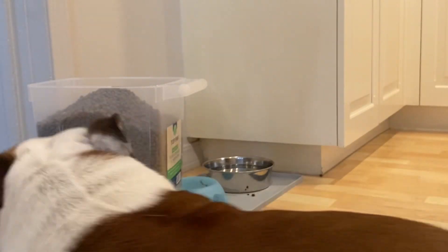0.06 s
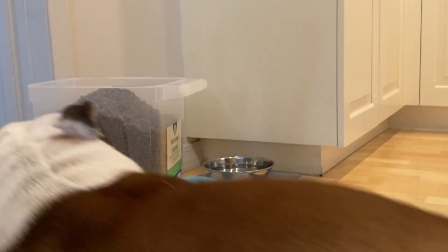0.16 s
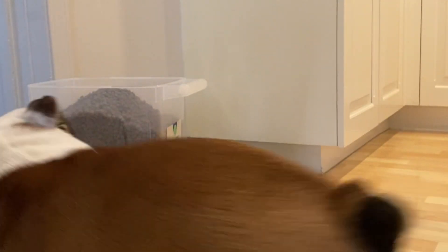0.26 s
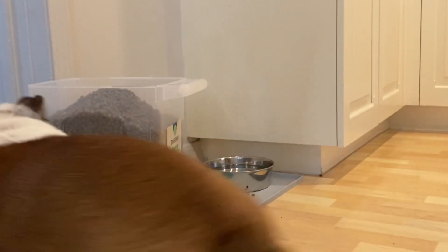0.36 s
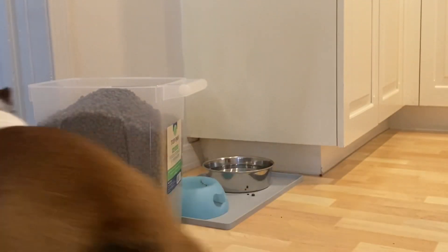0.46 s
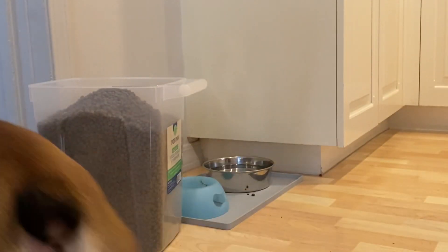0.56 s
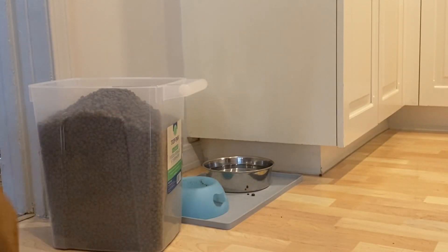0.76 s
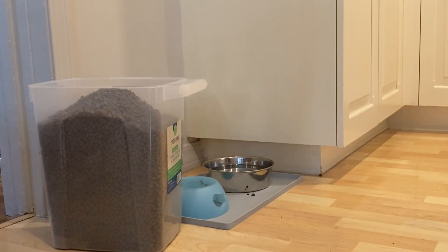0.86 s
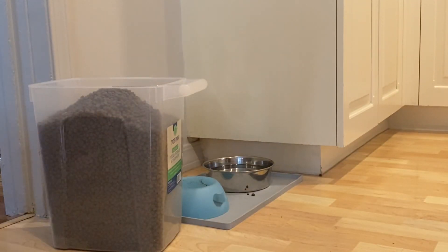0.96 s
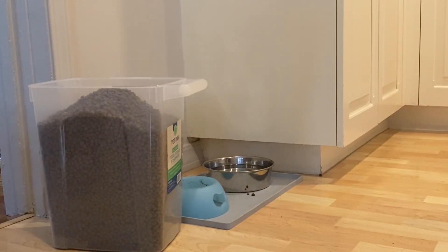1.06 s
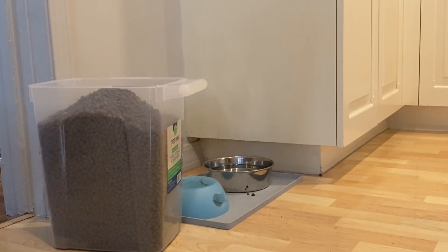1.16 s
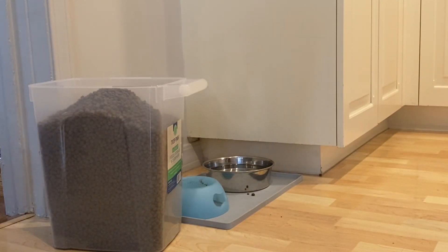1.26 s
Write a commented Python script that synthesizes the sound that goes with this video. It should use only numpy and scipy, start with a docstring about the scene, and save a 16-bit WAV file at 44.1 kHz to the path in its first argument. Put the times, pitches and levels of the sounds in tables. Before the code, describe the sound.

Dog claws click in quick clusters on a hard kitchen floor, with soft paw thuds and coat rustle. Early on, an unseen object thumps and clatters; the steps then fade away. Close stereo microphone, lively bare room, faint hiss.

```python
"""Soft paws thud and a coat rustles over a low hum and a faint hiss: a dog walks past on a hard kitchen floor.
Something out of sight thumps and clatters: noise bursts and struck modes that ring on.
Claws land in quick clusters, each a noise crack with a falling chirp of the boards; some skid as gritty
filtered noise. Full landings knock, as damped modes. Two close microphone ports hear it all."""
import sys
import numpy as np
from scipy import signal
from scipy.fft import rfft, irfft, next_fast_len
from scipy.io import wavfile
from scipy.ndimage import map_coordinates

SR = 44100
rng = np.random.default_rng(int(sys.argv[2]) if len(sys.argv) > 2 else 0)


def transcribe(signal):
    """Save signal, clipped to [-1, 1], as a 16-bit WAV file at the path in sys.argv[1]."""
    frames = np.atleast_2d(signal).T
    limited = np.clip(frames, -1, 1)
    pcm = np.round(limited * 32767).astype(np.int16)
    wavfile.write(sys.argv[1], SR, pcm)


N = 57330  # samples, 1.3 s

STRIKE_ATTACK_S = 0.00038  # shared by the thump and the knocks


def amp(db):
    """Decibels to gain."""
    return 10 ** (np.asarray(db) / 20)


def unit(x):
    """Scale to rms 1."""
    return x / np.sqrt(np.mean(x ** 2) + 1e-20)


def along(points, hz):
    """Read (Hz, value) points on a log frequency axis."""
    f, v = np.transpose(points)
    return np.interp(np.log(hz + 1), np.log(f + 1), v)


def filtered(x, response):
    """Multiply the spectrum of x by a response of frequency."""
    n = x.shape[-1]
    m = next_fast_len(2 * n)
    spectrum = rfft(x, m) * response(np.fft.rfftfreq(m, 1 / SR))
    return irfft(spectrum, m)[..., :n]


def noise(spectrum, size, tilt_db=0):
    """Two unrelated coloured noises, rms 1 together; the tilt in dB per octave slopes only the treble."""
    tilt_floor_hz, tilt_pivot_hz = 1730, 6000

    def colour(hz):
        octaves = np.log2(np.maximum(hz, tilt_floor_hz) / tilt_pivot_hz)
        return amp(along(spectrum, hz) + tilt_db * octaves)

    return unit(filtered(rng.standard_normal((2, size)), colour))


def fade(t, t60):
    """Free decay, falling 60 dB in t60 seconds."""
    return np.exp(-np.log(1000) * t / t60)


def onset(t, attack_s):
    """Exponential rise from rest."""
    return 1 - np.exp(-t / attack_s)


def dying(x, t60s):
    """Split x into overlapping bands and let each die at its own speed."""
    t = np.arange(x.shape[-1]) / SR
    corners = [hz for hz, _ in t60s]
    out = 0
    for (_, t60), pick in zip(t60s, np.eye(len(t60s))):
        weights = list(zip(corners, pick))  # 1 at this band's corner, 0 at the others
        band = filtered(x, lambda hz: along(weights, hz))
        out = out + band * amp(-60 * t / t60)
    return out


def wobble(rate):
    """A smooth random curve with rate knots a second."""
    knots = rng.standard_normal(N // 20)
    return map_coordinates(knots, [np.arange(N) * rate / SR], mode="mirror")


def ringing(modes, t, favoured_hz=None):
    """Damped modes: sines from zero in the first channel, at random phases in the second."""
    hz, db, t60 = np.transpose(modes)[..., None, None]
    if favoured_hz is not None:  # the spot that is struck favours the modes near one pitch
        spot_db, spot_octaves = 7.5, 0.27
        db = db + spot_db * np.exp(-(np.log2(hz / favoured_hz) / spot_octaves) ** 2)
    path_turns = rng.random(hz.shape) * [[0], [1]]
    return np.sum(amp(db) * fade(t, t60) * np.sin(2 * np.pi * (hz * t + path_turns)), axis=0)


def add(track, s, x):
    """Mix x into the track at time s."""
    i = max(0, round(s * SR))
    track[..., i:i + x.shape[-1]] += x[..., :N - i]


def room(x, wet_db):
    """The bare kitchen answers x with a decaying noise tail, different in each channel."""
    # decay of the room: f/Hz, t60/s
    room_t60 = [(200, 0.13), (1500, 0.59), (4000, 0.73), (7000, 0.52), (13000, 0.41)]
    # colour of the tail before it decays: f/Hz, level/dB
    room_colour = [(200, 10.5), (1000, 3), (2300, -1.5), (3500, -2.5), (4500, -5), (6500, -2), (9000, -3.5),
                   (12000, -4), (15500, -5.5)]
    build_s = 0.003
    t = np.arange(N) / SR
    tail = dying(noise(room_colour, N), room_t60) * onset(t, build_s)
    tail = tail / np.linalg.norm(tail[0])
    wet = signal.fftconvolve(x[:1], tail, axes=1)[:, :N]
    direct = np.pad(x, ((0, 0), (0, N - x.shape[1])))
    return direct + amp(wet_db) * wet


def background():
    """Steady coloured hiss under a low hum whose level sinks until it lifts a little at the very end."""
    # spectrum of the hum: f/Hz, relative density/dB per Hz
    hum_spectrum = [(20, 4.5), (40, -7.5), (61, 3.5), (85, -13), (200, -12.5), (500, -18.5), (2000, -45.5)]
    # course of the hum: t/s, level/dB
    hum_level = [(0, -45), (.75, -52.5), (1.092, -60.5), (1.15, -63.5), (1.3, -60)]
    # spectrum of the hiss: f/Hz, relative density/dB per Hz
    hiss_spectrum = [(100, 16.5), (400, 6.5), (1000, -3.5), (5000, -11), (9000, -16), (16000, -36)]
    hiss_db = -62
    hum_db = np.interp(np.arange(N) / SR, *np.transpose(hum_level))
    return amp(hum_db) * noise(hum_spectrum, N) + amp(hiss_db) * noise(hiss_spectrum, N)


def pads():
    """The dog's weight thuds on the boards: dying noise and the damped modes of the boards."""
    # soft footfalls: t/s, level/dB, favoured f/Hz
    footfalls = [(0, -53.5, 100), (0.081, -50.5, 312), (0.128, -39, 133), (0.189, -35.5, 300),
                 (.42, -44, 466), (.505, -36.5, 304), (0.5284, -35, 480), (.5925, -40.5, 665),
                 (.655, -52, 400), (.84, -53, 302), (1.138, -54.5, 595)]
    # spectrum of the thud: f/Hz, relative density/dB per Hz
    pad_spectrum = [(40, -25), (110, -7), (200, 0.5), (470, -2.5), (680, -12), (1000, -14.5), (2500, -43),
                    (8000, -49)]
    # decay of the thud: f/Hz, t60/s
    pad_t60 = [(150, 0.37), (1000, 0.49)]
    # modes of the boards: f/Hz, level/dB, t60/s
    board_modes = [(129.4, -8.5, 0.14), (295.4, -4.5, 0.24), (391.6, -7.5, 0.23), (470.5, -4.5, 0.16),
                   (644, -9.5, 0.31), (753, -11.5, 0.3)]
    thud_db, attack_s = -4.5, 0.0013
    out, t = np.zeros((2, N)), np.arange(SR // 2) / SR
    for s, db, favoured_hz in footfalls:
        thud = amp(thud_db) * dying(noise(pad_spectrum, len(t)), pad_t60)
        boards = ringing(board_modes, t, favoured_hz)
        add(out, s, amp(db) * (thud + boards) * onset(t, attack_s))
    return out


def rustles():
    """Coat and paws brush: short swells of coloured noise."""
    # swells: centre t/s, half length/s, level/dB, treble tilt/dB per octave
    swells = [(0, 0.013, -41, 0.5), (0.02, 0.066, -46, 0.5), (0.128, 0.024, -44, 6), (0.175, 0.026, -46, 0),
              (0.497, 0.063, -47, 4), (0.996, 0.008, -55, 1.5), (1.15, 0.019, -57.5, 0.5)]
    # spectrum before the tilt: f/Hz, relative density/dB per Hz
    rustle_spectrum = [(50, -53), (200, 6), (1000, 6), (1800, 9.5), (3200, 4.5), (6500, -2), (8500, -6),
                       (12000, -7.5), (16000, -17)]
    t = np.arange(N) / SR
    out = np.zeros((2, N))
    for s, half, db, tilt_db in swells:
        swell = 1 / (1 + np.abs((t - s) / half) ** 6) ** .5
        out += amp(db) * noise(rustle_spectrum, N, tilt_db) * swell
    return out


def skids(size=2048):
    """A sliding claw catches and slips: a squeak when its resonance is narrow, a gritty scuff when it is wide."""
    # slides: t/s, f/Hz, level/dB, length/s, half width of the resonance/Hz
    slides = [(.013, 6100, -43, 0.01, 402), (0.48, 6000, -36, 0.0024, 300),
              (0.513, 6330, -28.5, 0.0079, 240), (0.521, 5000, -36, 0.017, 1800),
              (.882, 5570, -37, 0.011, 1330), (1.174, 5330, -42.5, 0.014, 1300)]
    grit_db, grit_per_s, room_db = 2, 1200, -7
    out, t = np.zeros((2, N)), np.arange(size) / SR
    for s, pitch_hz, db, length, width_hz in slides:
        slips = rng.standard_normal((2, size)) * amp(grit_db * wobble(grit_per_s)[:size])
        scrape = unit(filtered(slips, lambda hz: 1 / (1 + ((hz - pitch_hz) / width_hz) ** 2)))
        swell = np.sin(np.pi * np.minimum(t / length, 1))
        add(out, s, room(amp(db) * scrape * swell, room_db))
    return out


def thump():
    """A few blows in quick succession: dull body noise, rattling clatter, ringing modes and one low boom."""
    # blows: t/s, body level/dB, clatter level/dB, ring level/dB, favoured f/Hz
    blows = [(.2, -29, -27, -39, 990), (.204, -22, -24, -29, 420), (0.2096, -28, -22.5, -32, 165),
             (0.2352, -25, -30.5, -26, 876), (0.25, -31.5, -43, -27, 640), (.295, -40, -33, -41, 166)]
    # spectra of body and clatter: f/Hz, relative density/dB per Hz
    body_spectrum = [(20, -47), (60, -24), (100, -15), (130, -3.5), (200, 0), (330, 7.5), (560, 1.5),
                     (950, 0), (1250, -17), (2500, -32), (6000, -60)]
    clatter_spectrum = [(150, -3), (700, -9.5), (1500, 0), (2900, -0.5), (4500, -2), (6400, -2),
                        (8000, -10), (11500, -10), (14000, -21), (16000, -45)]
    # decays of body and clatter: f/Hz, t60/s
    body_t60 = [(60, 0.35), (150, 0.61), (330, 0.58), (700, 0.57), (2500, 1)]
    clatter_t60 = [(700, 1), (2000, 0.64), (5000, 0.38), (12000, 0.34)]
    # modes of the thumped thing: f/Hz, level/dB, t60/s
    thump_modes = [(161.4, -0.5, 0.19), (249.5, -4, 0.72), (319.3, -4.5, 0.22), (382, -19.5, .3),
                   (499.5, -0.5, 0.21), (660, -3.5, 0.28), (824.4, -3, 0.21), (1017, -11.5, 0.36),
                   (1047, -10, 0.41), (1527, -13.5, 0.69), (2695, -18, 0.28), (2927, -12, 0.16)]
    rattle_db, rattle_per_s, rattle_t60_s = 1.5, 300, 0.43
    boom_s, boom_hz, boom_db, boom_t60_s, boom_attack_s = .236, 62.8, -29.5, 0.31, 0.0052
    out, t = np.zeros((2, N)), np.arange(N) / SR
    for s, body_db, clatter_db, ring_db, favoured_hz in blows:
        body = dying(noise(body_spectrum, N), body_t60)
        # the clatter is uneven at first and smooths out as it fills the room
        rattle = amp(rattle_db * wobble(rattle_per_s) * fade(t, rattle_t60_s))
        clatter = dying(noise(clatter_spectrum, N), clatter_t60) * rattle
        ring = ringing(thump_modes, t, favoured_hz)
        blow = amp(body_db) * body + amp(clatter_db) * clatter + amp(ring_db) * ring
        add(out, s, onset(t, STRIKE_ATTACK_S) * blow)
    # the floor gives under the blows
    boom = ringing([(boom_hz, boom_db, boom_t60_s)], t) * onset(t, boom_attack_s)
    add(out, boom_s, boom)
    return out


def claws(size=2048):
    """Each claw cracks on the floor; bending waves in the boards arrive treble first, as a falling chirp."""
    # ticks: t/s, level/dB, treble tilt/dB per octave
    ticks = [(0.2413, -19, 12), (0.29, -14, 8.5), (.293, -29, 19), (0.297, -25, -9.5), (0.42, -26.5, -2.5),
             (0.4695, -34, -1), (0.4817, -24.5, 3), (0.4854, -21.5, -0.5), (0.6291, -33, -5.5),
             (.6555, -37, -4.5), (0.7057, -24.5, -1.5), (0.709, -28.5, 6.5), (0.7091, -20, -1),
             (0.742, -28.5, -1), (0.8591, -31.5, -2.5), (0.8732, -38, -1), (0.897, -26, 0),
             (0.8992, -25, 2.5), (.902, -29.5, -3), (1.087, -49.5, -12), (1.1438, -43, -7.5),
             (1.1919, -33, -1.5), (1.1979, -31, -3.5), (1.2009, -28.5, 0)]
    # spectrum of a crack before the tilt: f/Hz, relative density/dB per Hz
    tick_spectrum = [(60, -38), (200, -21), (420, -6.5), (700, -13), (1400, -13), (2300, -9.5), (3700, 0),
                     (6300, 7), (8000, 4), (11500, 3), (15500, -10.5)]
    # decay of a crack: f/Hz, t60/s
    tick_t60 = [(400, 0.044), (1500, 0.042), (4000, 0.037), (7000, 0.014), (14000, 0.011)]
    bite_s, room_db = 0.000098, -6  # time a claw takes to bite; level of the room's answer
    start_hz, end_hz, fall_s, chirp_t60_s, chirp_db = 6880, 3550, 0.00189, 0.037, -8
    pitch_scatter = 0.0818  # spread of the log pitch from claw to claw
    out, t = np.zeros((2, N)), np.arange(size) / SR
    chirp_hz = end_hz + (start_hz - end_hz) * np.exp(-t / fall_s)
    for s, db, tilt_db in ticks:
        crack = dying(noise(tick_spectrum, size, tilt_db), tick_t60) * onset(t, bite_s)
        pitch = np.exp(rng.normal(0, pitch_scatter))
        turns = np.cumsum(chirp_hz) / SR * pitch + rng.random((2, 1))
        chirp = np.sin(2 * np.pi * turns) * fade(t, chirp_t60_s) * onset(t, fall_s)
        # the more treble in the crack, the weaker its chirp
        tick = crack + amp(chirp_db - tilt_db) * chirp
        add(out, s, room(amp(db) * tick, room_db))
    return out


def knocks():
    """A paw that lands squarely sets the woody modes of the floor ringing."""
    # full landings: t/s, level/dB, favoured f/Hz
    landings = [(0.297, -32.5, 4150), (.7075, -31, 3755), (.7425, -47, 3880), (.8995, -50, 6300),
                (1.2015, -49, 2930)]
    # modes of the floor: f/Hz, level/dB, t60/s
    knock_modes = [(447, -14, 0.13), (893, -11, 0.072), (1382, -8.5, 0.078), (2896, -1, 0.041),
                   (3770, -4, 0.063), (4240, -13, 0.16), (4340, -17, 0.12), (6160, 3, 0.043)]
    out, t = np.zeros((2, N)), np.arange(SR // 4) / SR
    for s, db, favoured_hz in landings:
        knock = ringing(knock_modes, t, favoured_hz) * onset(t, STRIKE_ATTACK_S)
        add(out, s, amp(db) * knock)
    return out


def ports(pair):
    """Two close microphone ports: the side is partly the mid a quarter turn away, partly unrelated sound."""
    # f/Hz, side over mid/dB, share of the side in quadrature with the mid (-1 to 1)
    port_table = np.array([(60, -16, -0.25), (252, -9.5, -0.97), (775, -1, 0.086), (1140, 0, 0.27),
                           (1660, -7, 0.92), (2340, -46, 1), (3750, -33, -0.14), (4540, -9.5, -0.56),
                           (5500, -3, -0.99), (5770, 5.5, -0.17), (6130, -15, 0.4), (6570, -3, -.8),
                           (8300, 5.5, -0.96), (11300, -5.5, -0.76), (12300, -26, -0.2)])

    def side_response(hz):
        gain = amp(along(port_table[:, [0, 1]], hz))
        share = np.clip(along(port_table[:, [0, 2]], hz), -1, 1)
        return gain * np.array([1j * share, np.sqrt(1 - share ** 2)])

    mid = pair[0]
    side = filtered(pair, side_response).sum(axis=0)
    return np.array([mid + side, mid - side])


def scene():
    """The dog, the thump and the background together at the microphone ports."""
    dog = pads() + rustles() + skids() + claws() + knocks()
    return ports(background() + dog + thump())


def record(dry):
    """The microphone cuts the deepest bass, has one narrow notch and keeps nothing above its band limit."""
    notch_hz, notch_width_hz, notch_db = 5650, 140, -3.5
    low_cut_hz, top_hz = 39, 15800

    def response(hz):
        notch = amp(notch_db / (1 + ((hz - notch_hz) / notch_width_hz) ** 2))
        low_cut = hz ** 2 / np.hypot(hz ** 2, low_cut_hz ** 2)
        return notch * low_cut * (hz < top_hz)

    return filtered(dry, response)


dry = scene()
out = record(dry)
transcribe(out)
```